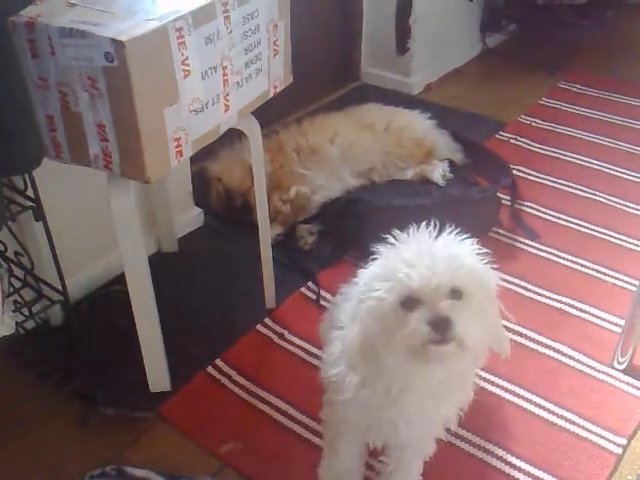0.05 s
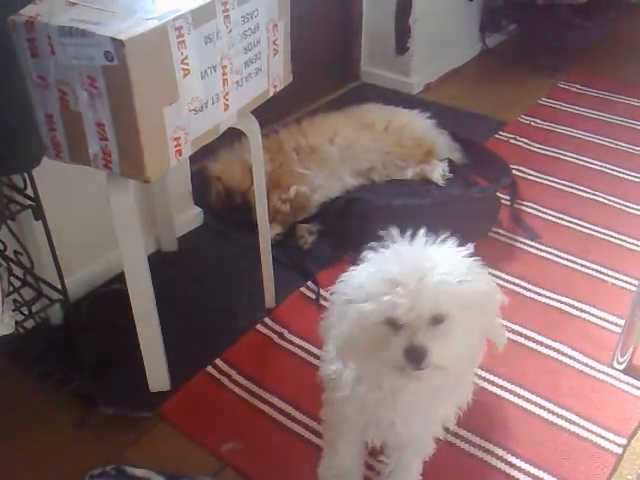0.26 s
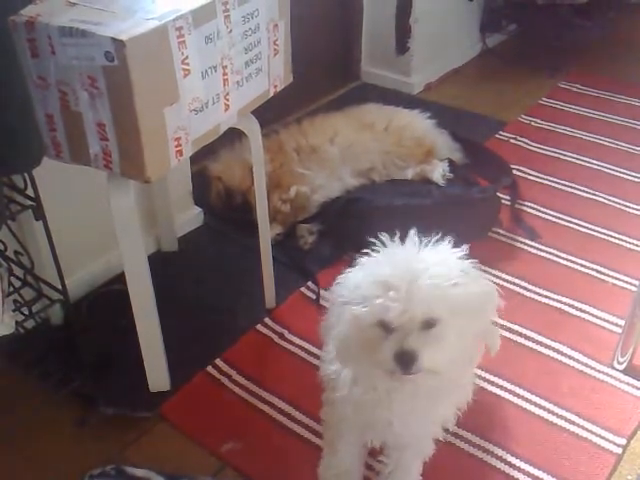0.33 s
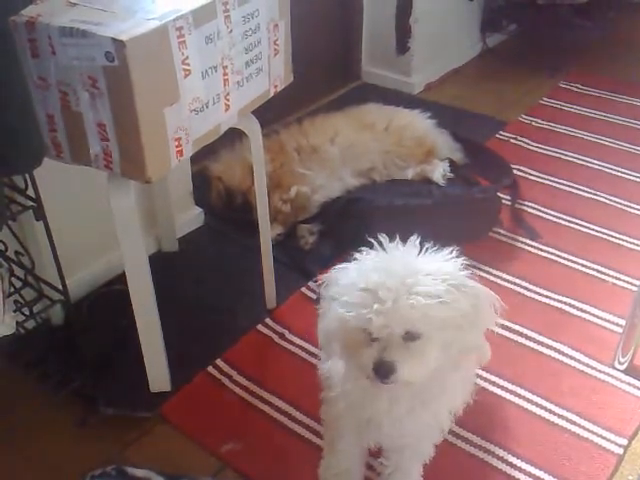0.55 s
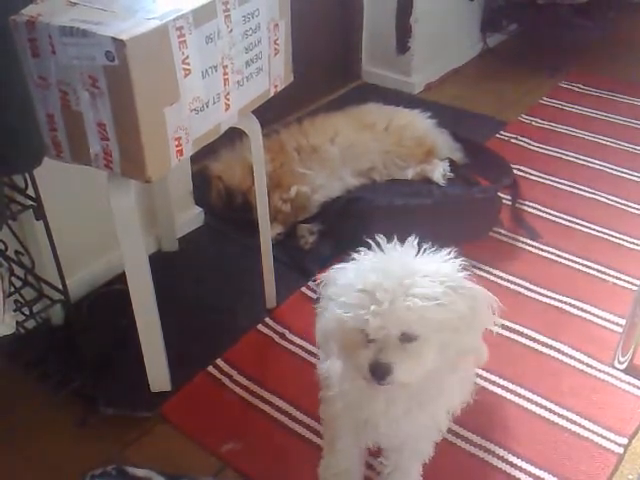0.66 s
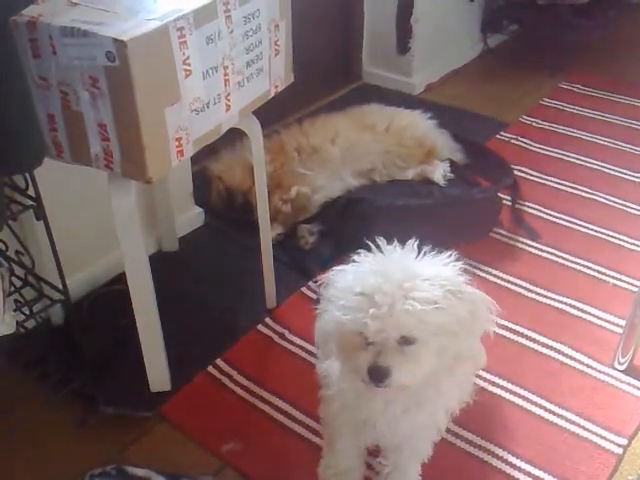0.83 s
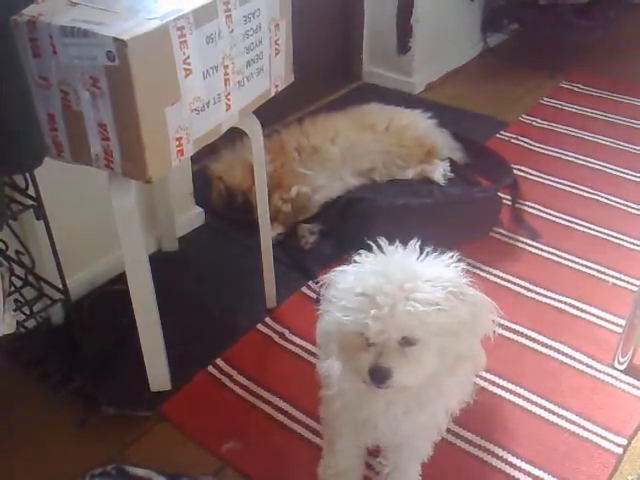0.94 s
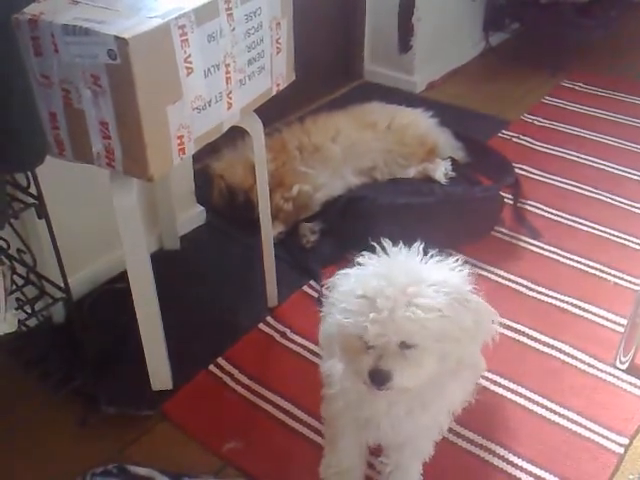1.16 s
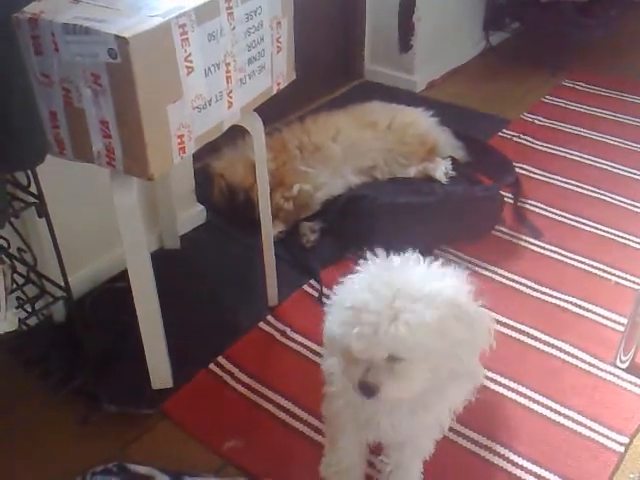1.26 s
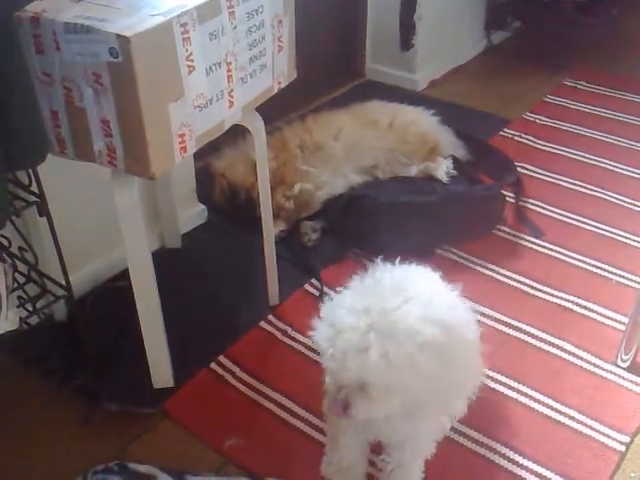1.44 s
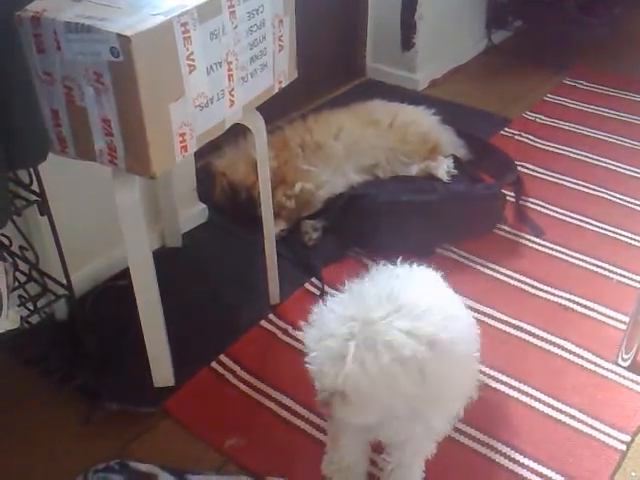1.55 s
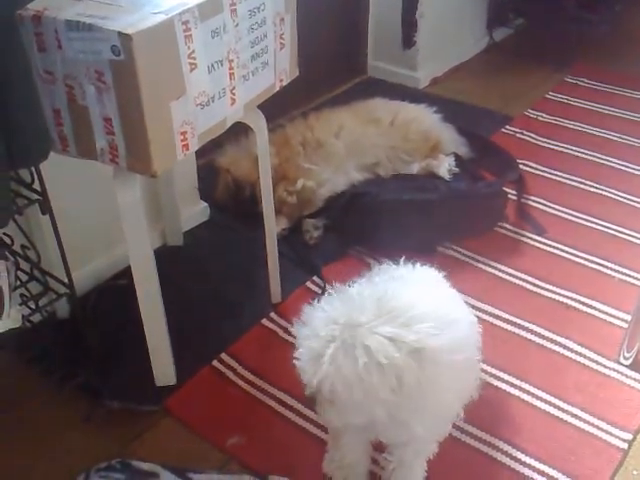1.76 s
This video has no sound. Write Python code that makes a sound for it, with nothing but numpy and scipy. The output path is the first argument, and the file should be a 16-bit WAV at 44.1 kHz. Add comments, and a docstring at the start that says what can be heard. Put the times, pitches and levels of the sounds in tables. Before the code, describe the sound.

Shrill kissing squeaks, air sucked through pursed lips to call a dog: one comes first, then after a pause two more in quick succession. They sound wet, raspy and fairly close, in a small room with a faint hum.

```python
"""Three shrill squeaks, like air sucked through pursed lips to call a dog, in a small living room.
Airflow drives a tight wet gap into self-sustained oscillation at a few kHz, jumping from pitch to pitch.
Between and under the tones, irregular snaps excite the resonance of the cavity behind the gap: a rasp.
A faint hum, room air, one faint short tone and a soft bump lie below."""
import sys
import numpy as np
from scipy import signal
from scipy.fft import rfft, irfft
from scipy.io import wavfile
from scipy.ndimage import uniform_filter1d

SR = 44100
rng = np.random.default_rng(int(sys.argv[2]) if len(sys.argv) > 2 else 0)


def to_wav(sig):
    """Store sig (one row per channel, or 1-D mono) as 16-bit WAV at the path in sys.argv[1].

    Samples outside -1..1 are clipped; the rate is SR.
    """
    pcm = np.clip(np.atleast_2d(sig), -1, 1) * 32767
    pcm = np.round(pcm).astype(np.int16)
    wavfile.write(sys.argv[1], SR, pcm.T)  # frames by channels


N = 79380
T = np.arange(N) / SR

# partials of the hum (frequency [Hz], base level [dB])
HUM_PARTIALS = [(64.6, -83.5), (301.5, -81.5), (349.9, -68), (398.4, -75), (527.6, -84), (613.7, -84),
                (705.2, -81)]
# envelope of the hum (time [s], gain [dB])
HUM_GAIN = [(0, -16), (0.4, -4), (0.9, 3), (1.8, 1)]
# spectrum of the room air (frequency [Hz], relative spectral density [dB])
AIR_SPECTRUM = [(15, -20.5), (25, -2.5), (64, -1.5), (267, -6.5), (349, -10.5), (421, -10), (614, -14),
                (804, -16.5), (970, -18), (1170, -21.5), (1380, -18.5), (4870, -29), (15500, -29.5)]
# envelope of the low-mid noise (time [s], level [dB])
LOW_MID_LEVEL = [(0, -85), (0.5, -76.5), (0.65, -68), (0.78, -80.5), (0.9, -66.5), (1.1, -80.5),
                 (1.42, -66), (1.8, -80.5)]
# stretches of oscillation of the gap (start [s], time to release [s], first pitch [Hz],
# last pitch [Hz], level [dB], roughness [0-1], octave re fundamental [dB])
FLUTTER_TONES = [ (0.173, 0.076, 3420, 3680, -49.5, 0.4, -25.5), (0.179, 0.02, 2370, 2370, -45, 0.28, -7),
                 (0.198, 0.025, 2400, 2467, -32.5, 0.38, -0.5),
                 (0.232, 0.015, 3425, 3447, -26, 0.12, -29.5), (0.241, 0.023, 2452, 2584, -48, 0.30, -18),
                 (0.287, 0.032, 3988, 3992, -31.5, 0.3, -27), (0.312, 0.022, 3678, 3641, -26.5, 0.28, -17),
                 (1.204, 0.044, 5950, 5880, -48, 0.26, -27.5),
                 (1.217, 0.037, 3535, 3682, -42.5, 0.24, -13.5), (1.219, 0.029, 4300, 4370, -33, 0.55, -15),
                 (1.247, 0.031, 4553, 4620, -32.5, 0.44, -25.5), (1.375, 0.026, 3865, 3860, -38, 0.41, -26),
                 (1.387, 0.028, 5390, 5504, -40.5, 0.40, -13.5),
                 (1.409, 0.0423, 3854, 4006, -31, 0.32, -15), (1.451, 0.033, 4950, 4920, -33.5, 0.27, -23),
                 ]
# treble bursts (start [s], rise [s], hold [s], release [s], level [dB], tilt [dB/octave])
SIZZLE_BURSTS = [(0.178, 0.016, 0.16, 0.025, -55, 1.5), (1.2, 0.039, 0.033, 0.028, -43.5, 0.5),
                 (1.391, 0.02, 0.029, 0.074, -41, 0.5)]
# spectrum of the sizzle before its tilt (frequency [Hz], relative spectral density [dB])
SIZZLE_SPECTRUM = [(500, -31), (1200, -16.5), (3000, -11), (5900, 8.5), (6900, -14), (8000, -2.5),
                   (10000, 0), (11700, 2), (12600, -6), (15500, -3)]
# rasp of each squeak (start [s], rise [s], hold [s], release [s], level [dB], low edge [Hz],
# high edge [Hz], resonance [Hz], resonance width [Hz], resonance re band [dB])
RASP_BURSTS = [ (0.182, 0.032, 0.033, 0.046, -35, 2890, 5070, 4290, 745, -7.5),
               (1.187, 0.058, 0.013, 0.043, -33.5, 3500, 5860, 4440, 1300, 8),
               (1.381, 0.032, 0.047, 0.032, -34.5, 3680, 6270, 4850, 1180, 7.5), ]
# low wet crackles (start [s], time to release [s], centre [Hz], width [Hz], level [dB])
CRACKLE_BURSTS = [(0.239, 0.044, 1863, 550, -56.5), (0.287, 0.034, 2470, 400, -51),
                  (1.194, 0.050, 1910, 700, -64.5), (1.367, 0.040, 2034, 805, -56),
                  (1.437, 0.046, 1980, 700, -63.5), (1.522, 0.0083, 3030, 249, -55.5)]
# brief loud flicks of the gap (time [s], pitch [Hz], envelope peak [dB])
GAP_FLICKS = [(0.334, 3760, -20.5), (1.261, 4590, -17), (1.417, 4210, -20)]

ATTACK_S, RELEASE_S = 0.0068, 0.0078


def undb(db):
    """Amplitude ratio of a level in decibels."""
    return 10 ** (np.asarray(db) / 20)


def unit(x):
    """Normalisation to unit rms."""
    return x / np.sqrt(np.mean(x ** 2))


def colour(x, points):
    """Spectral shaping by (frequency [Hz], gain [dB]) points, at unit rms."""
    hz, db = np.array(points).T
    bins_hz = np.maximum(np.fft.rfftfreq(N, 1 / SR), 1)
    gain = undb(np.interp(np.log(bins_hz), np.log(hz), db))
    return unit(irfft(rfft(x) * gain, N))


def resonate(x, hz, width_hz):
    """Steep resonance: two like band-passes in cascade, each width_hz wide, at unit rms."""
    b, a = signal.iirpeak(hz, hz / width_hz, fs=SR)
    return unit(signal.lfilter(b, a, signal.lfilter(b, a, x)))


def wander(rate_hz):
    """Random modulation: noise low-passed at half of rate_hz, at unit rms."""
    lowpass = signal.butter(2, rate_hz / 2, fs=SR, output="sos")
    return unit(signal.sosfilt(lowpass, rng.standard_normal(N)))


def swell(start, rise, hold, release):
    """Amplitude envelope with raised-cosine flanks."""
    ramp = np.interp(T - start, np.cumsum([0, rise, hold, release]), [0, 1, 1, 0])
    return np.sin(np.pi / 2 * ramp) ** 2


def snaps(per_s=3000, spread_db=1):
    """Shot noise: impulses of random timing, size and sign."""
    occurs = rng.random(N) < per_s / SR
    return occurs * undb(spread_db * rng.standard_normal(N)) * np.sign(rng.standard_normal(N))


def hum():
    """Superposition of low partials, each slowly modulated in amplitude and frequency."""
    out = np.zeros(N)
    for hz, db in HUM_PARTIALS:
        amplitude = np.sqrt(2) * undb(db + 1.8 * wander(6))
        cycles = np.cumsum(hz + 1.43 * wander(2.8)) / SR + rng.random()
        out += amplitude * np.sin(2 * np.pi * cycles)
    return out * undb(np.interp(T, *np.array(HUM_GAIN).T))


def room_air(floor_db=-62.5):
    """Ambient noise: a steady broadband floor and a low-mid band that swells faintly."""
    mids = resonate(rng.standard_normal(N), hz=460, width_hz=460)
    mids *= undb(np.interp(T, *np.array(LOW_MID_LEVEL).T))
    return mids + undb(floor_db) * colour(rng.standard_normal(N), AIR_SPECTRUM)


def flutter(jitter=0.09, shimmer_db=6, wander_hz=525):
    """Self-sustained oscillation of the gap; roughness scales the unsteadiness of period and strength."""
    out = np.zeros(N)
    for start, length, first_hz, last_hz, db, roughness, octave_db in FLUTTER_TONES:
        glide_hz = np.interp(T, [start, start + length], [first_hz, last_hz])
        hz = glide_hz * (1 + jitter * roughness * wander(wander_hz))
        phase = 2 * np.pi * np.cumsum(hz) / SR
        third_db = -27.5 if first_hz < 3000 else -7.5  # third harmonic re the octave
        overtones = np.sin(2 * phase) + undb(third_db) * np.sin(3 * phase)
        wave = np.sin(phase) + undb(octave_db) * overtones
        wave = unit(wave * undb(shimmer_db * roughness * wander(wander_hz)))
        out += undb(db) * wave * swell(start, ATTACK_S, length - ATTACK_S, RELEASE_S)
    return out


def sizzle():
    """Short impulses have broad spectra: the sharp edges of the snaps reach far into the treble."""
    hz, spectrum_db = np.array(SIZZLE_SPECTRUM).T
    out = np.zeros(N)
    for start, rise, hold, release, db, tilt in SIZZLE_BURSTS:
        tilted = np.c_[hz, spectrum_db + tilt * np.log2(hz)]
        out += undb(db) * swell(start, rise, hold, release) * colour(snaps(), tilted)
    return out


def rasp():
    """Impulse excitation: snaps ring the cavity, a steep-sided band with one resonance in it."""
    out = np.zeros(N)
    for start, rise, hold, release, db, low_hz, high_hz, hz, width_hz, ring_db in RASP_BURSTS:
        bandpass = signal.butter(6, [low_hz, high_hz], "bandpass", fs=SR, output="sos")
        band = unit(signal.sosfilt(bandpass, snaps()))
        ring = undb(ring_db) * resonate(band, hz, width_hz)
        out += undb(db) * swell(start, rise, hold, release) * unit(band + ring)
    return out


def crackle():
    """Band-limited shot noise: a weaker, lower wet crackle in each squeak."""
    out = np.zeros(N)
    for start, length, hz, width_hz, db in CRACKLE_BURSTS:
        envelope = swell(start, ATTACK_S, length - ATTACK_S, RELEASE_S)
        out += undb(db) * envelope * resonate(snaps(), hz, width_hz)
    return out


def flicks(half_width_s=0.001):
    """Gaussian wave packets: a few strong cycles of the gap at the height of each squeak."""
    return sum(undb(db) * np.exp(-((T - at) / half_width_s) ** 2) * np.sin(2 * np.pi * hz * (T - at))
               for at, hz, db in GAP_FLICKS)


def faint_tone(hz=616, db=-64):
    """A short sinusoid with slight random frequency modulation, between the first two squeaks."""
    phase = 2 * np.pi * np.cumsum(hz + 8 * wander(60)) / SR
    return undb(db) * np.sqrt(2) * np.sin(phase) * swell(start=0.623, rise=0.02, hold=0.022, release=0.035)


def bump(start_s=1.362, decay_s=0.027, db=-50):
    """Exponential decay of a low noise band: a soft dull knock just before the last squeak."""
    decay = (T > start_s) * np.exp(-np.abs(T - start_s) / decay_s)
    envelope = uniform_filter1d(decay, size=90)  # rounds the onset over 2 ms
    return undb(db) * envelope * resonate(rng.standard_normal(N), hz=429, width_hz=360)


def room(x, t60_s=0.25, treble_t60_s=0.18, crossover_hz=6000, first_echo_s=0.0011):
    """Reverberation: direct sound plus dense wall echoes of equal energy, whose treble dies sooner."""
    noise = rng.standard_normal(N)
    low = signal.sosfiltfilt(signal.butter(2, crossover_hz, fs=SR, output="sos"), noise)
    tail = low * undb(-60 * T / t60_s) + (noise - low) * undb(-60 * T / treble_t60_s)
    tail *= T > first_echo_s
    echoes = signal.fftconvolve(x, tail / np.sqrt(np.sum(tail ** 2)))[:N]
    return (x + echoes) / np.sqrt(2)


def scene():
    """Superposition of all sources at one point in the room, alike in both channels."""
    squeaks = flutter() + flicks() + rasp() + sizzle() + crackle()
    mono = room(squeaks + bump()) + faint_tone() + hum() + room_air()
    return np.array([mono, mono])


def record(dry, cutoff_hz=15650):
    """Band limiting: a steep low-pass removes the highest treble."""
    return signal.sosfilt(signal.ellip(10, .2, 70, cutoff_hz, fs=SR, output="sos"), dry)


dry = scene()
out = record(dry)
to_wav(out)
```